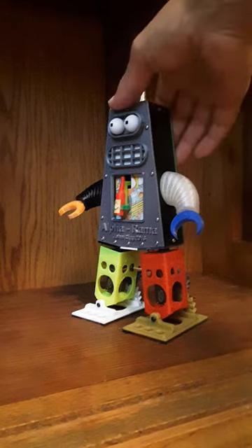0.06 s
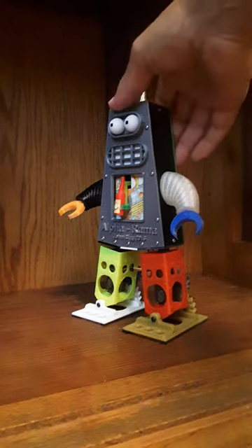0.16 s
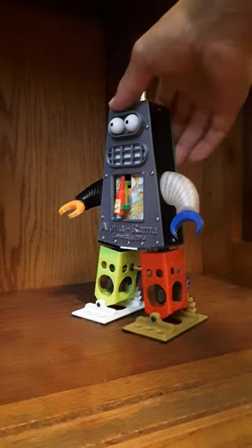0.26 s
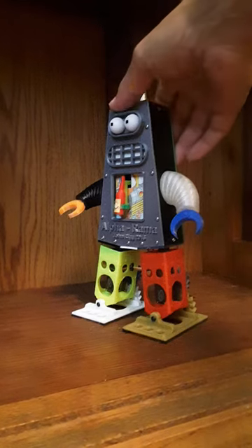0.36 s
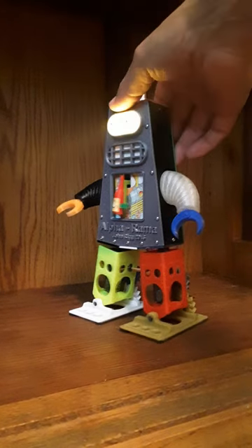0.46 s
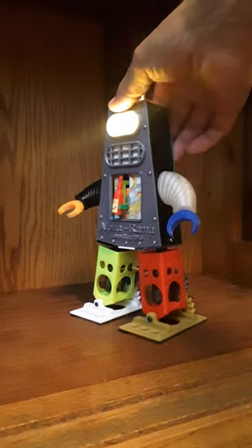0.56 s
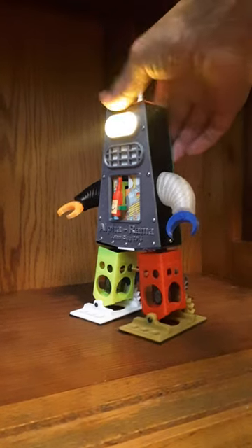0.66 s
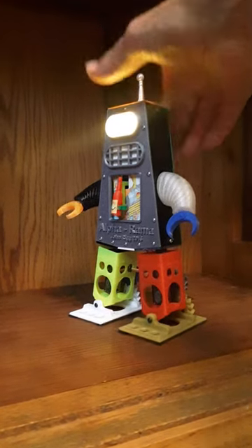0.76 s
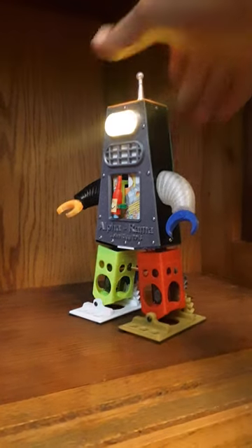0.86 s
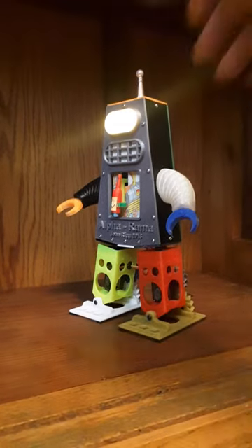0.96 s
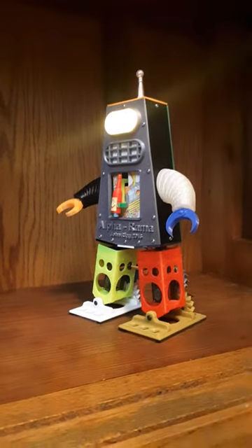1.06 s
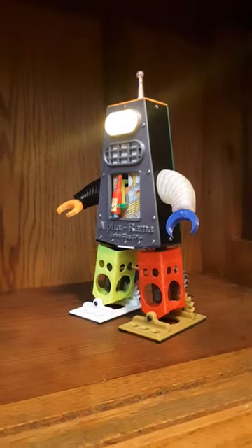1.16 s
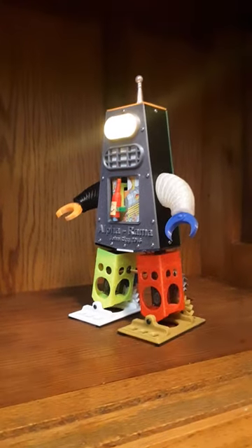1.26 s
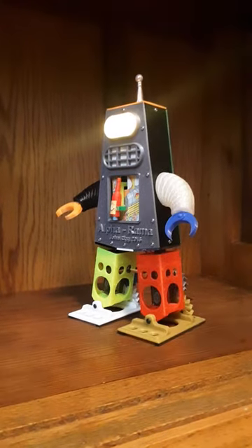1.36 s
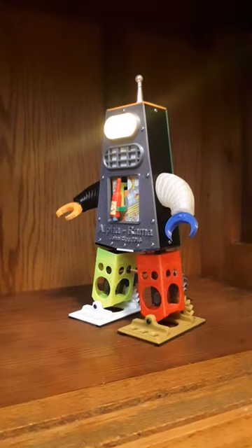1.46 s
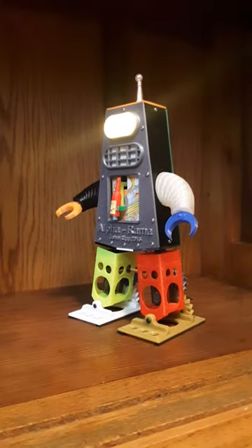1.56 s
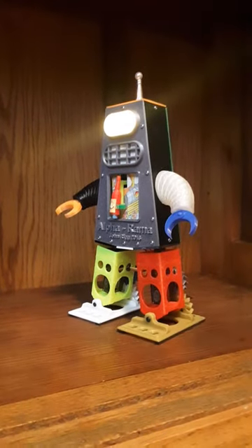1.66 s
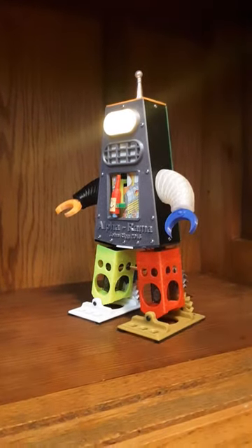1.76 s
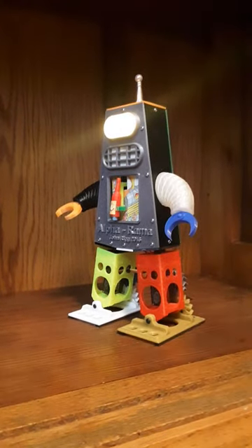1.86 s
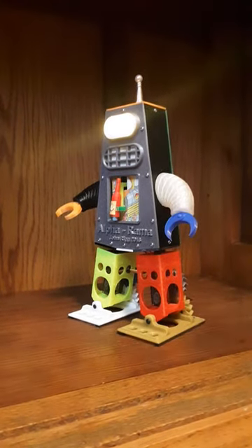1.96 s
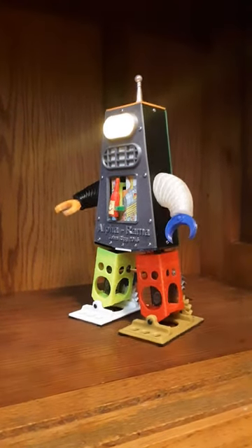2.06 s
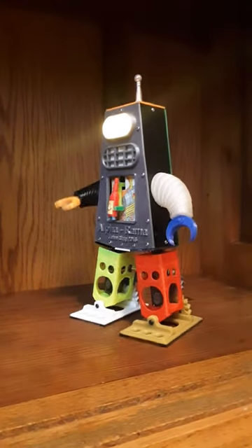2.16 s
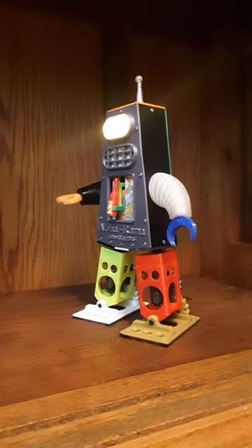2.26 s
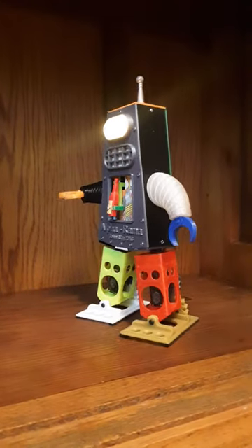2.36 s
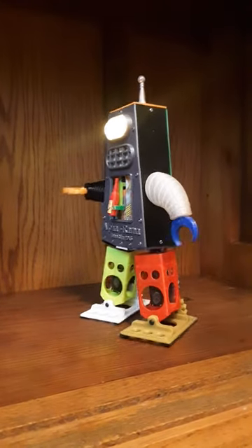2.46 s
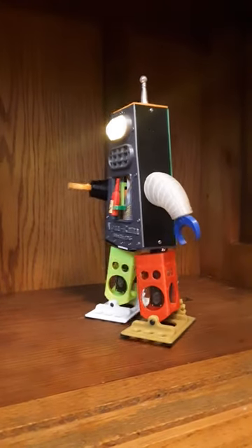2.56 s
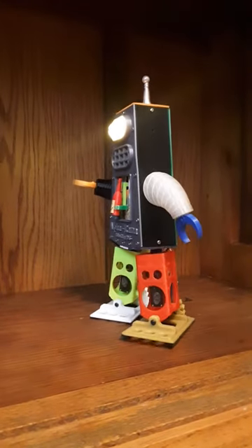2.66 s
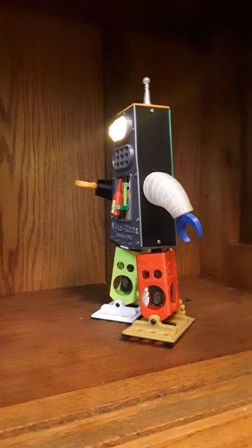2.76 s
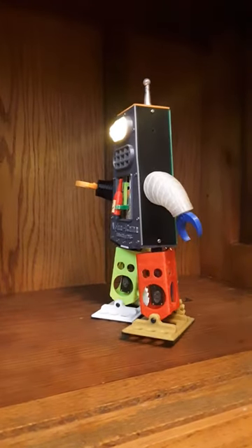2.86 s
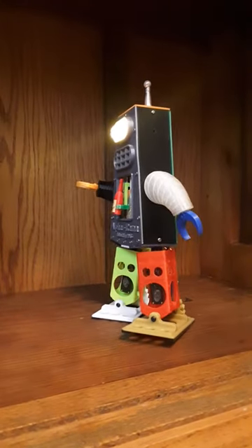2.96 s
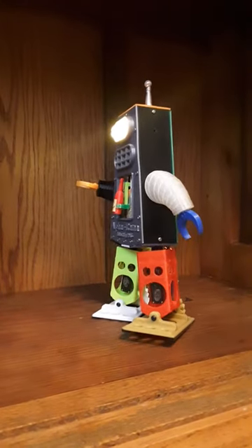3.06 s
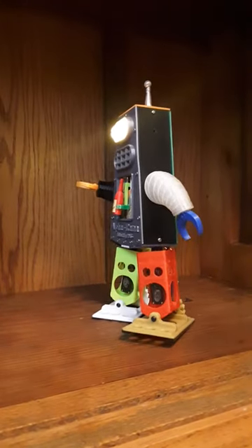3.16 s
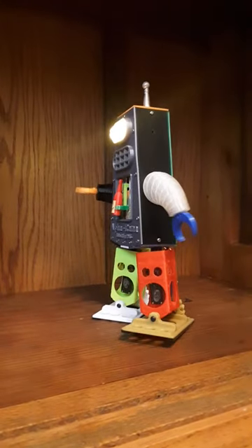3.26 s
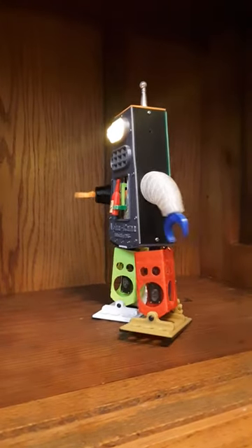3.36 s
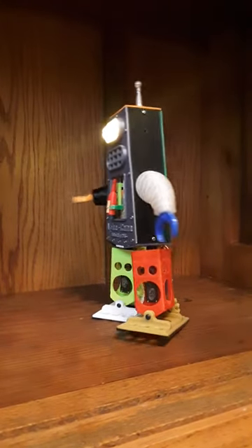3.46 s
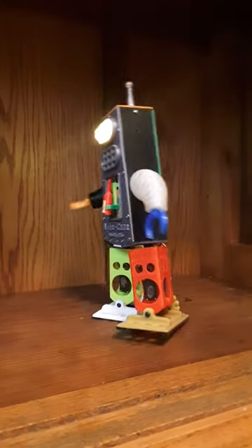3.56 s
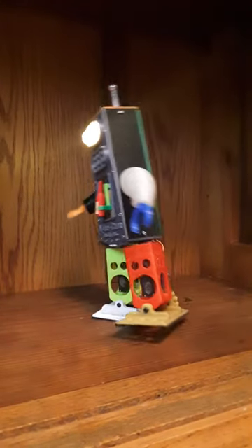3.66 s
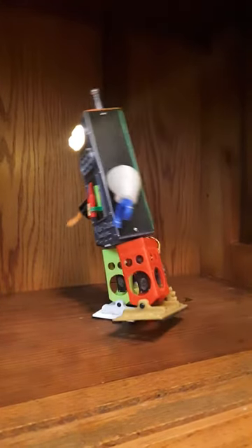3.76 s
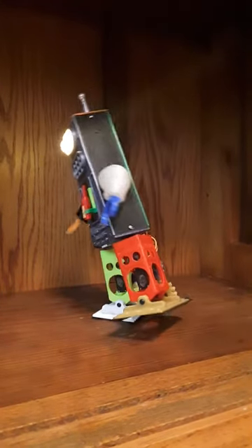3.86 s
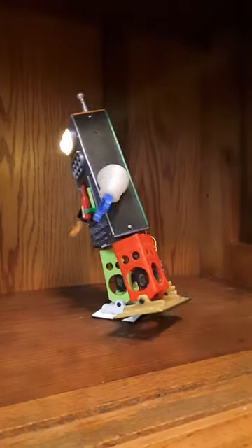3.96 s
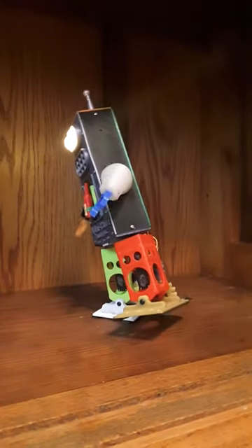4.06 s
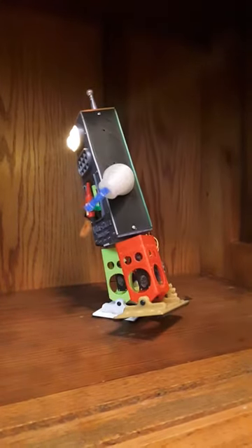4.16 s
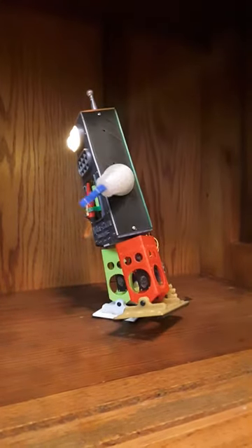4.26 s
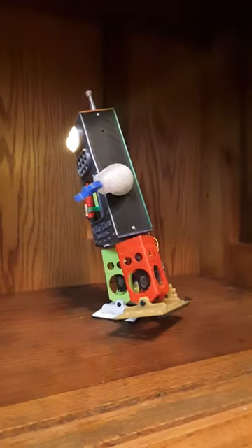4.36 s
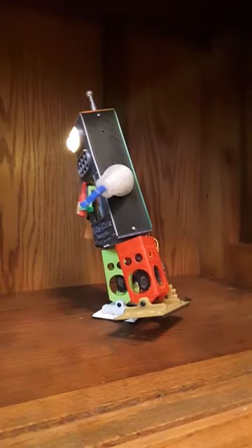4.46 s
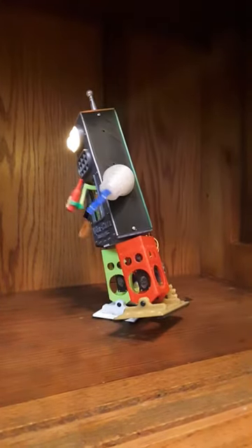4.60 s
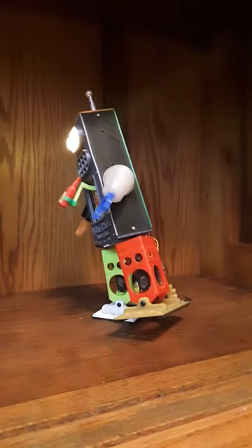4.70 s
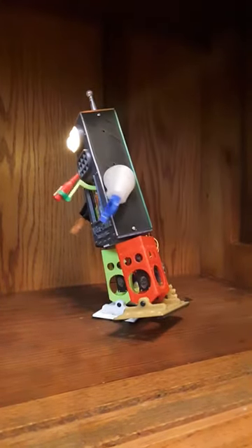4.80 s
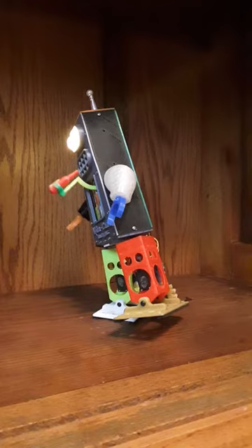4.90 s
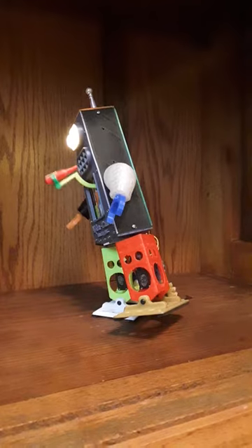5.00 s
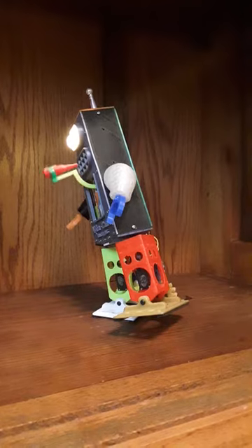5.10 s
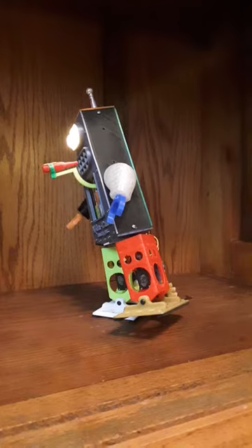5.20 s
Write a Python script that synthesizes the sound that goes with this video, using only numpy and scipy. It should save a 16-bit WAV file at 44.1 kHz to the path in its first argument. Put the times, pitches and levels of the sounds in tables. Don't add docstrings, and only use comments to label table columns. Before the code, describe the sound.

A hard plastic snap and short gear burst, a quiet spell, then buzzy pulsing servo whirs with heavy foot knocks on wood.

```python
import sys
import numpy as np
from scipy import signal
from scipy.fft import rfft, irfft
from scipy.io import wavfile
from scipy.ndimage import uniform_filter1d

SR = 44100
rng = np.random.default_rng(int(sys.argv[2]) if len(sys.argv) > 2 else 0)


def natural_amplitude(level_db):
    exponent = np.asarray(level_db, float) / 20
    return 10 ** exponent


def wav_record(signal):
    frames = np.transpose(np.atleast_2d(signal))
    bounded = np.clip(frames, -1, 1)
    quanta = np.round(bounded * 32767).astype(np.int16)
    wavfile.write(sys.argv[1], SR, quanta)


N = 230883
TIME = np.arange(N) / SR
DRIVE_HZ = 50

# frequency in Hz, level in dB per Hz
GEAR_COLOUR = [(290, -48), (500, -14), (553, -10), (795, -48), (1190, -15.5), (1420, -18.5), (1790, -6.5),
               (2230, -17.5), (2430, -15), (2850, -7.5), (4400, 2), (6140, -6.5), (7640, -18), (14200, -15),
               (16000, -25)]
# frequency in Hz, level in dB, 60 dB decay in seconds
SHELF_MODES = [(106, -22, 0.54), (140.1, -9.5, 0.13), (210, -7, 0.089), (278, 2, 0.017),
               (323.5, -0.5, 0.039), (484, 1, 0.032), (607, -4, 0.062), (693, 4.5, 0.0091),
               (1117, 7.5, 0.019), (1404, 6, 0.038), (1460, 8.5, 0.029), (1850, 7.5, 0.02)]


def unit(x):
    return x / np.sqrt(np.mean(x ** 2))


def colour(x, points, share=1):
    hz, db = np.transpose(points)
    grid_hz = np.fft.rfftfreq(4096, 1 / SR) + 1
    log_gain = np.interp(np.log(grid_hz), np.log(hz), db * share) * np.log(10) / 20
    cepstrum = irfft(log_gain)
    cepstrum[1:2048] *= 2
    cepstrum[2049:] = 0
    response = irfft(np.exp(rfft(cepstrum)))[:2048]
    return signal.fftconvolve(x, response)[:len(x)]


def band(x, lo_hz, hi_hz, order=3):
    return signal.sosfilt(signal.butter(order, [lo_hz, hi_hz], "band", fs=SR, output="sos"), x)


def ring(x, hz, t60):
    pole = np.exp((2j * np.pi * hz - np.log(1000) / t60) / SR)
    return signal.lfilter([1], [1, -pole], x).imag


def walk(rate):
    k = int(SR / rate)
    return uniform_filter1d(np.repeat(rng.standard_normal(N // k + 1), k), k)[:N]


def clicks(rate, scatter_db):
    hit, size, sign = rng.random((3, N))
    strength = natural_amplitude(-scatter_db * np.log(size + 1e-6))
    return unit((hit < rate / SR) * strength * np.sign(sign - .5))


def curves(tables):
    s, *columns = np.concatenate(tables).T
    on = sum(1. * (TIME >= table[0][0]) * (TIME < table[-1][0]) for table in tables)
    return [np.interp(TIME, s, c) for c in columns] + [uniform_filter1d(on, size=100)]


def held(rows, glide_s):
    s, *columns = np.transpose(rows)
    row = np.searchsorted(s, TIME, side="right").clip(1) - 1
    return [uniform_filter1d(c[row], int(glide_s * SR) + 1) for c in columns]


def swells(rows, extra_db=0):
    total = 0
    extra_db = np.broadcast_to(extra_db, len(rows))
    for (s, db, rise, fade, *rest), extra in zip(rows, extra_db):
        slope = np.minimum((TIME - s) / max(rise, .001), (s - TIME) / max(fade, .001))
        total = total + natural_amplitude(db + extra) * np.exp(slope)
    return total


def drive_turns():
    # start in seconds, phase in turns, drift in turns per second
    drives = [(0, 0.73, -.016), (2.026, 0.018, 0.17), (2.728, 0.058, 0.022), (3.224, 0.71, 0.016)]
    since, phase, drift = held([(s, s, p, d) for s, p, d in drives], 0)
    return DRIVE_HZ * TIME + phase + drift * (TIME - since)


def room():
    # frequency in Hz, level in dB per Hz
    room_colour = [(15, -50), (25, -18), (117, 2.5), (190, -11), (249, -0.5), (384, -21), (545, -16.5),
                   (818, -24.5), (1790, -21), (2480, -28), (3340, -19), (4140, -26), (5880, -27),
                   (7510, -38.5), (16000, -22)]
    mid, side = (colour(rng.standard_normal(N), room_colour) for _ in range(2))
    side = colour(side, [(60, -4.0), (200, -4.5), (700, -0.5), (16000, 3.0)])
    hiss = natural_amplitude(-66.5) * unit(mid + side * np.array([[1], [-1]]))
    hum = natural_amplitude(-67) * unit(ring(rng.standard_normal(N), 111, 0.13))
    mains = natural_amplitude(-69 + 0.98 * walk(12)) * np.sin(2 * np.pi * 120 * TIME)
    return hiss + hum + mains


def hand():
    # peak in seconds, rustle level in dB, rise in seconds,
    # fade in seconds, airy part minus rustle in dB
    slides = [(.024, -55, 0.047, 0.092, -5.5), (.16, -67, 0.018, 0.021, 0), (.352, -69, 0.0028, 0.0075, -5),
              (.476, -56, 0.088, 0.0032, -8), (0.905, -54, 0.0074, 0.072, -19),
              (.998, -63.5, 0.057, 0.0087, 5), (1.06, -69, 0.0066, 0.023, -11),
              (1.23, -62.5, 0.022, 0.13, -14), (1.79, -58.5, 0.12, 0.02, -10),
              (1.894, -62, 0.026, 0.062, -18)]
    # peak in seconds, level in dB, rise in seconds, fade in seconds
    thumb_rub = [(1.56, -64, 0.11, 0.085)]
    # start in seconds, peak in dB, pitch in Hz
    case_ticks = [(0.0622, -44.5, 5200), (0.1554, -47.5, 5880), (0.2194, -51, 5900), (0.3475, -56, 5230),
                  (0.4273, -47, 6140), (0.9032, -57, 5270), (0.9373, -43.5, 5600), (0.9765, -39, 5600),
                  (1.068, -52, 6000), (1.286, -60, 1850), (1.3078, -50, 5400), (1.408, -73, 5920),
                  (1.51, -53.5, 5800), (1.532, -44.5, 1650), (1.6818, -48, 5830), (1.7933, -45, 5830),
                  (1.891, -53, 6200)]
    # start in seconds, peak in dB, pitch in Hz
    palm_bumps = [(.012, -39, 180), (0.827, -41, 326), (.903, -28.5, 204), (.95, -47, 203),
                  (1.287, -39.5, 228), (1.412, -45.5, 109.7), (1.717, -37, 177), (1.737, -44, 260),
                  (2.799, -35, 90)]
    resting = natural_amplitude(-79.5) * (TIME < 2.0)
    rustle = resting + swells(slides)
    airy = resting + swells(slides, np.transpose(slides)[4])
    rub = natural_amplitude(-13) * rustle + swells(thumb_rub)

    grains = np.clip(clicks(900, scatter_db=4.3), -14, 14) + 0.49 * rng.standard_normal(N)
    slips = natural_amplitude(1.95 * walk(49.35)) * grains
    skin = rustle * unit(band(slips, 4750, 6330, order=2))
    skin += airy * unit(band(slips, 10500, 15100, order=2))
    skin += rub * unit(band(slips, 1545, 2050, order=2))

    after = np.arange(900) / SR
    for s, db, hz in case_ticks:
        shape = np.exp(-after * hz / 4) * np.minimum(after * hz / 1.4, 1)
        skin[int(s * SR):][:900] += natural_amplitude(db + 7.5) * np.sin(2 * np.pi * hz * after) * shape
    bumps = np.zeros(N)
    for s, db, hz in palm_bumps:
        cycles = np.arange(4000) / SR * hz
        shape = cycles ** 0.59 * np.exp(-cycles / 0.27)
        bumps[int(s * SR):][:4000] -= natural_amplitude(db + 10.5) * np.sin(2 * np.pi * cycles) * shape
    return band(bumps, 85, 3000, order=1) + skin * natural_amplitude(np.array([[-16], [0]]))


def holding():
    # start in seconds, hum level in dB, ankle tick level in dB, hip tick level in dB
    poses = [
        (0, -120, -120, -120),
        (1.34, -78, -71, -90),
        (2.7, -78, -64, -65),
        (3.5, -84, -66.5, -71),
        (4.3, -66, -55, -53),
    ]
    # frequency in Hz, level in dB, 60 dB decay in seconds
    hum_modes = [(565, 0, .07), (640, -2, .04), (720, -4, .05), (450, -12, .04)]
    # peak in seconds, level in dB, rise in seconds, fade in seconds
    strain = [(2.7, 13, .01, .28)]
    hum_db, ankle_db, hip_db = held(poses, glide_s=0.09)
    pulses = np.diff(np.floor(DRIVE_HZ * TIME + 0.343), prepend=0) * natural_amplitude(1.2 * walk(40))
    hum = unit(sum(natural_amplitude(db) * unit(ring(pulses, hz, t60)) for hz, db, t60 in hum_modes))

    def twitch(turns):
        return np.exp(-(turns % 1) / 0.088) * natural_amplitude(walk(42)) * rng.standard_normal(N)

    def tick(chatter, walls_hz):
        return unit(sum(ring(chatter, hz, .01) for hz in walls_hz))

    ankle_turns = DRIVE_HZ * TIME + .6
    ankle = tick(twitch(ankle_turns), (4200, 5900))
    hip = tick(twitch(drive_turns()), (3650, 3900, 2600))
    rattle = twitch(ankle_turns) * (ankle_turns % 2 < 1)
    ankle = ankle + (TIME > 2.7) * natural_amplitude(-10) * unit(band(rattle, 7000, 13000, order=2))
    ticks = natural_amplitude(ankle_db) * ankle + (1 + swells(strain)) * natural_amplitude(hip_db) * hip
    return natural_amplitude(hum_db) * hum + band(ticks, 2900, 13000, order=2)


def knocks():
    # start in seconds, peak in dB, contact in seconds
    footfalls = [(0.486, -52, 0.00025), (0.552, -26, 0.000095), (0.569, -26.5, 0.0019),
                 (0.631, -36, 0.0013), (2.222, -30.5, 0.00093), (3.253, -63, 0.0021), (3.6, -18, 0.00064),
                 (3.613, -30, 0.00083), (3.671, -28.5, 0.0011), (3.766, -13, 0.0006), (3.77, -21, 0.00035),
                 (3.788, -21.5, 0.0011), (3.812, -33, 0.00063)]
    # start in seconds, peak in dB, length in seconds
    creaks = [(0.232, -69, 0.035), (0.484, -36, 0.0176), (0.701, -47, 0.028), (2.68, -58, 0.046),
              (3.3, -62, .25)]
    force = np.zeros(N)
    for s, db, contact in footfalls:
        push = np.hanning(int(max(contact, 1e-4) * SR) + 3)
        force[int(s * SR):][:len(push)] += natural_amplitude(db) * push / push.sum()
    clatter = rng.standard_normal(4000) * np.exp(-np.arange(4000) / SR / 0.031)
    force = force + 0.15 * signal.fftconvolve(force, clatter)[:N] / 8
    board = sum((-1) ** k * natural_amplitude(db) * ring(force, hz, t60) for k, (hz, db, t60) in enumerate(SHELF_MODES))

    slip = sum(natural_amplitude(db) * np.exp(-((TIME - s - length / 2) / length * 3) ** 2) for s, db, length in creaks)
    creak = unit(ring(clicks(1400, scatter_db=0), 565, 0.07))
    creak = creak + 0.4 * unit(ring(clicks(900, scatter_db=0), 960, .06))
    return natural_amplitude(-12.5) * board + natural_amplitude(-1) * slip * creak


def slack():
    # start in seconds, peak in dB, fade in seconds
    power_on = (.4866, -7, .004)
    # start in seconds, peak in dB, fade in seconds
    jolts = [(0.5014, -30.5, 0.01), (0.5114, -14, 0.0045), (0.5524, -24, 0.0038), (2.0591, -41, 0.006),
             (2.172, -24, 0.0082), (3.2105, -45, 0.005), (3.2488, -34, 0.0066), (4.031, -26, 0.012),
             (4.3131, -25.5, 0.0071), (4.4337, -25, 0.0062), (4.6897, -25.5, 0.011), (5.0294, -29, 0.0067),
             (5.1291, -22.5, 0.0064), (5.1711, -29, 0.0068)]
    snaps = [power_on] + list(jolts)
    force = 0
    for s, db, fade in snaps:
        force = force + (TIME > s) * natural_amplitude(db - 11) * np.exp(-np.clip(TIME - s, 0, 1) / max(fade, .001))
    impacts = clicks(12000, scatter_db=1.0)
    impacts[[int(s * SR) + 2 for s, db, fade in snaps]] = 7.0
    return force * unit(colour(impacts, GEAR_COLOUR, share=0.95))


def servos():
    # time in seconds, tooth level in dB
    effort = [
        [(0.486, -25.5), (.52, -28.5), (0.562, -33.5), (.578, -45), (0.622, -55.5), (0.7, -59), (0.756, -64),
         (0.88, -82)],
        [(2.005, -58), (2.041, -37.5), (2.097, -33.5), (2.165, -40.5), (2.239, -34.5), (2.677, -33),
         (2.727, -50.5), (2.895, -58.5), (3.208, -60.5)],
        [(3.208, -44), (3.246, -38), (3.468, -38.5), (3.6, -39.5), (3.66, -36), (3.738, -45), (3.765, -43)],
        [(3.765, -32.5), (3.889, -46), (3.963, -34.5), (4.022, -45), (4.042, -31), (4.185, -38), (4.289, -43),
         (4.327, -33.5), (4.432, -46.5)],
        [(4.432, -31.5), (4.472, -30), (4.52, -34.5), (4.676, -34), (4.87, -31.5), (4.982, -39), (5.14, -43),
         (5.174, -35), (5.235, -64.5)],
    ]
    # start in seconds, housing minus teeth in dB, fizz minus teeth in dB,
    # nearest shell walls in Hz, steady shelf shake in dB
    joints = [(0, -9, -7, 5400, -68), (.575, -7, -12, 5500, -64), (.66, -6, -15.5, 3730, -78),
              (2.0, -9, -12.5, 5600, -63), (2.3, -11, -10.5, 4650, -45), (2.72, -7.5, -15, 3720, -49.5),
              (3.208, -10.5, -14.5, 5450, -67), (3.62, -11.5, -14.5, 5170, -66),
              (3.8, -13.5, -17.5, 4200, -57.5), (4.432, -9, -11.5, 4700, -61.5),
              (4.95, -8.5, -12.5, 5440, -77)]
    # peak in seconds, shelf shake in dB, rise in seconds,
    # fade in seconds, shake centre in Hz
    lurches = [(.55, -37, 0.27, 0.095, 177.6), (2.041, -35.5, 0.011, 0.14, 157),
               (2.239, -42.5, 0.033, 0.062, 171), (2.5, -82, .1, .15, 147.4), (2.68, -63, .05, 0.018, 189),
               (3.246, -36.5, 0.0013, 0.093, 170.6), (3.45, -45, 0.017, 0.11, 201),
               (3.55, -36, 0.019, 0.048, 201), (3.592, -38.5, 0.058, 0.0095, 207),
               (3.676, -31.5, 0.023, 0.022, 172), (3.766, -29, 0.00061, 0.022, 207),
               (4.3, -64, 0.042, 0.045, 263), (4.92, -60, 0.017, 0.067, 245)]
    # frequency in Hz, width in Hz, level in dB
    shell = [(1150, 47, -32), (1849, 40, -7.5), (2488, 56, -2.5), (3340, 8.3, -2), (3590, 55, 7.5),
             (4140, 160, -6.5), (5900, 83, 5), (5300, 110, -14)]
    # time in seconds, level in dB
    turning_away = [(.5, 7), (2.7, 6.5), (3.2, -0.5), (4.4, 13), (4.6, -3)]
    teeth_db, on = curves(effort)
    housing_db, fizz_db, walls_hz, shake_db = held(joints, glide_s=0.017)

    pulsing_db = np.minimum(2 + 0.5 * (-36 - teeth_db), 4.5).clip(0)
    turns = drive_turns() + 0.11 * walk(4.9)
    turn, cycle = turns % 1, turns.astype(int)
    uneven = rng.standard_normal(N // 800)[cycle]
    torque = turn / 0.29 * np.exp(1 - turn / 0.24)
    drive = natural_amplitude(pulsing_db * (2 * torque * (2.5 + 0.14 * uneven) - 1.5) + 1.32 * walk(30))

    impacts = clicks(7000, scatter_db=2.5)
    rings = 0
    for hz, width, db in shell:
        far_db = np.minimum(12 * abs(np.log2(hz / walls_hz)), 6.)
        wall = ring(clicks(3000, scatter_db=1.5), hz, 1.2 / width) * width ** .5
        rings = rings + natural_amplitude(db + 0.53 * walk(18) - far_db) * wall
    gears = unit(colour(impacts, GEAR_COLOUR)) + natural_amplitude(-4.5) * unit(rings)

    teeth = unit(band(gears, 2300, 7300))
    housing = unit(band(gears, 900, 2300))
    fizz = unit(band(gears, 7300, 12500))
    air = unit(band(gears, 12500, 17000))
    fizz = fizz + natural_amplitude(np.interp(TIME, *np.transpose(turning_away)) - 12.5) * air
    whir = drive * (teeth + natural_amplitude(housing_db + 1.8 * walk(60)) * housing + natural_amplitude(fizz_db) * fizz)

    shake_hz = np.interp(TIME, *np.transpose(lurches)[[0, 4]])
    shake = 0
    for hz, db, t60 in SHELF_MODES[:6]:
        far_db = np.minimum(30 * abs(np.log2(hz / shake_hz)), 19.)
        shake = shake + natural_amplitude(2 * walk(18) - far_db) * unit(ring(rng.standard_normal(N), hz, 1.1 * t60))
    shake = (natural_amplitude(shake_db) + swells(lurches)) * natural_amplitude(-5.0) * band(shake, 77, 443, order=2)
    return on * natural_amplitude(teeth_db - 1.5) * whir, on * shake


def cupboard(whir, hits):
    # frequency in Hz, left minus right in dB
    port_shading = [(200, 2.5), (800, -1), (1600, -9), (2350, 1.5), (3500, -5), (4700, 2), (6000, -13.5),
                    (7500, 6.5), (9000, 14), (11000, 2.5), (15000, 2.5)]
    fade_s, pose_s, right_late = 0.00988, .02, 18
    after, hop = np.arange(5000) / SR, int(pose_s * SR)
    walls = np.pad(natural_amplitude(2) * whir + natural_amplitude(-5) * hits, (hop, 2 * hop))
    window = np.sqrt(np.hanning(2 * hop))
    out = np.zeros((2, N + 3 * hop + 5000))
    for start in range(0, N, hop):
        echoes = rng.standard_normal((2, len(after))) * np.exp(-after / fade_s) * (after > .0012)
        echoes /= np.sqrt(np.sum(echoes ** 2, axis=1))[:, None]
        heard = signal.fftconvolve((walls[start:start + 2 * hop] * window)[None], echoes, axes=1)
        out[:, start:start + heard.shape[1]] += heard
    direct = whir + hits
    out = out[:, hop:hop + N] + [direct, np.roll(direct, right_late)]
    return np.array([colour(port, port_shading, side) for port, side in zip(out, (.5, -.5))])


def scene():
    whir, shake = servos()
    board = knocks() + holding()
    hits = slack() + natural_amplitude(1.5) * band(board, 450, 9100, order=1)
    airborne = cupboard(natural_amplitude(-4.5) * whir, hits)
    sway = 0.13 * np.roll(shake, 900) * np.array([[1], [-1]])
    thump = band(board, 100, 456, order=2)
    return airborne + shake + sway + thump + hand() + room()


def low_pass(x):
    return signal.sosfilt(signal.butter(12, 16840, fs=SR, output="sos"), x)


def record(dry):
    dry = signal.sosfilt(signal.ellip(8, .2, 60, 15850, fs=SR, output="sos"), dry)
    dry = signal.sosfilt(signal.butter(2, 55, "high", fs=SR, output="sos"), dry)
    return low_pass(dry)


dry = scene()
out = record(dry)
wav_record(out)
```